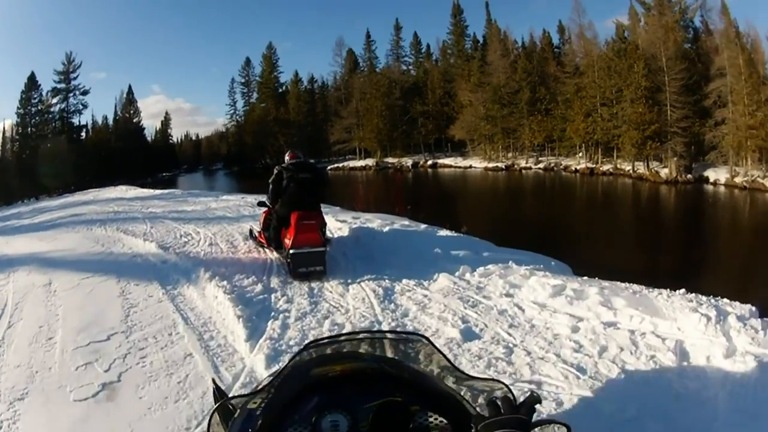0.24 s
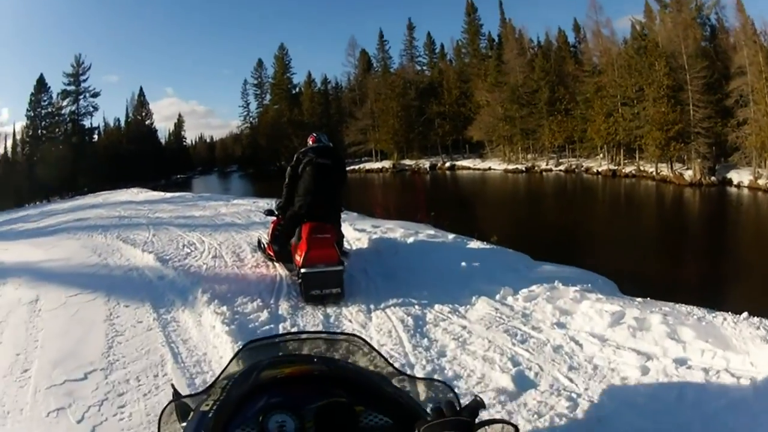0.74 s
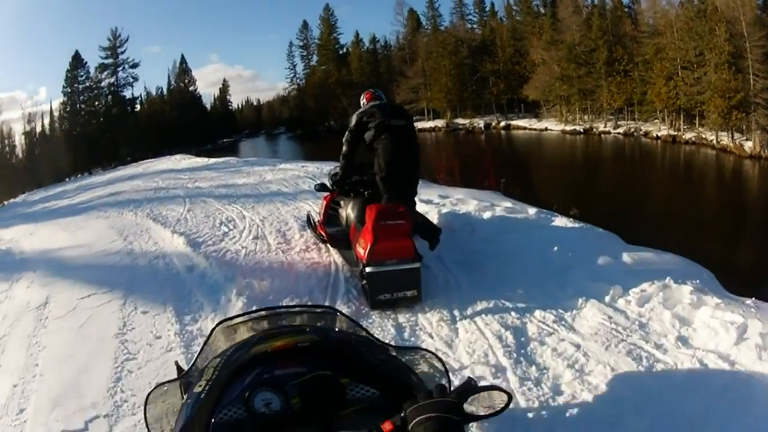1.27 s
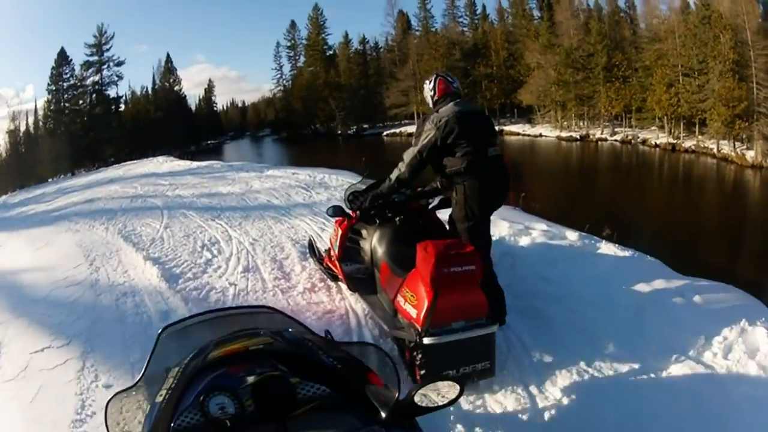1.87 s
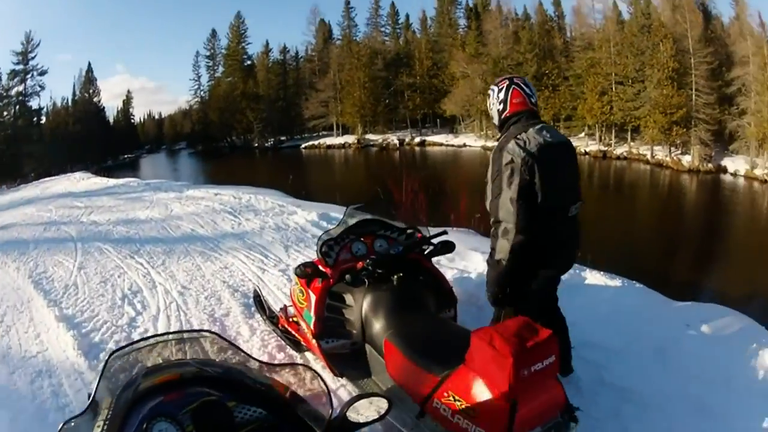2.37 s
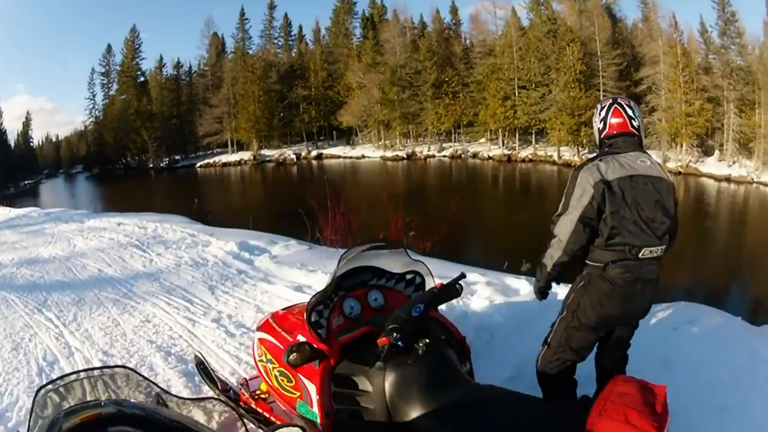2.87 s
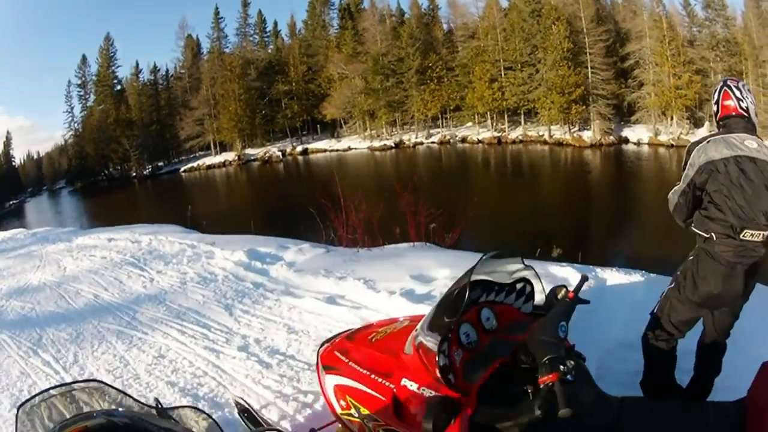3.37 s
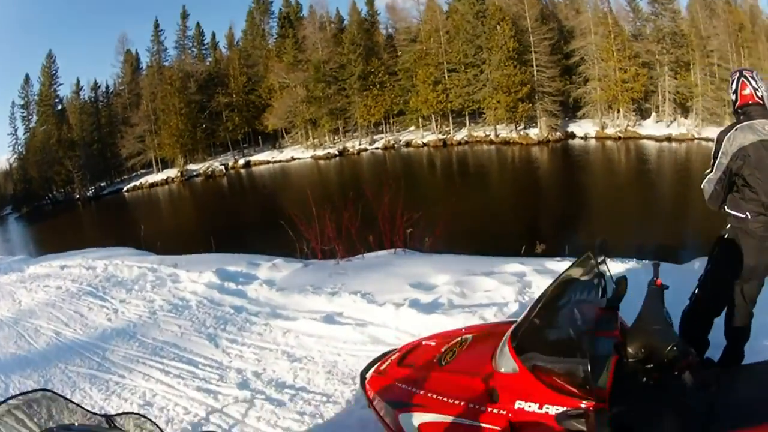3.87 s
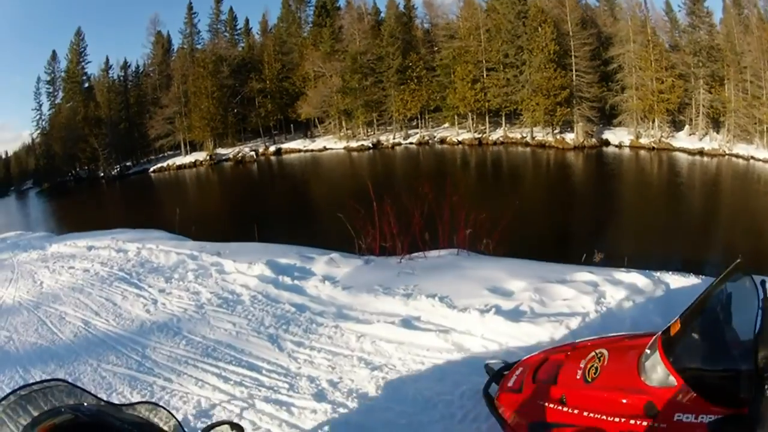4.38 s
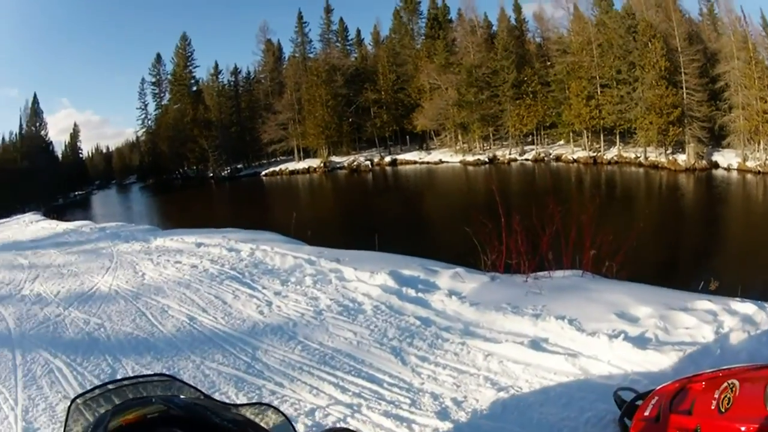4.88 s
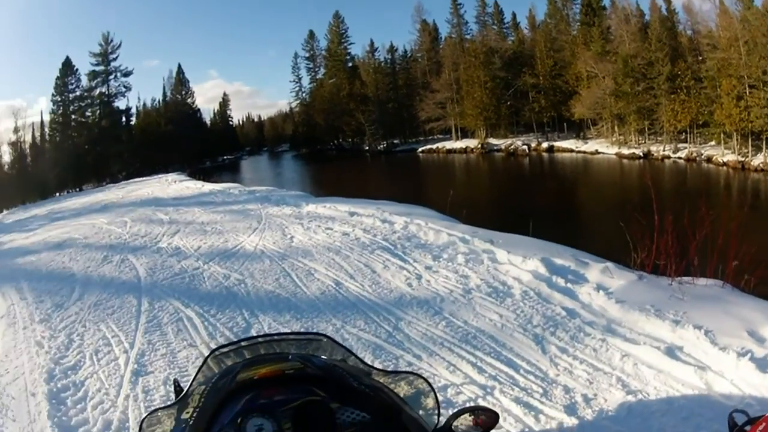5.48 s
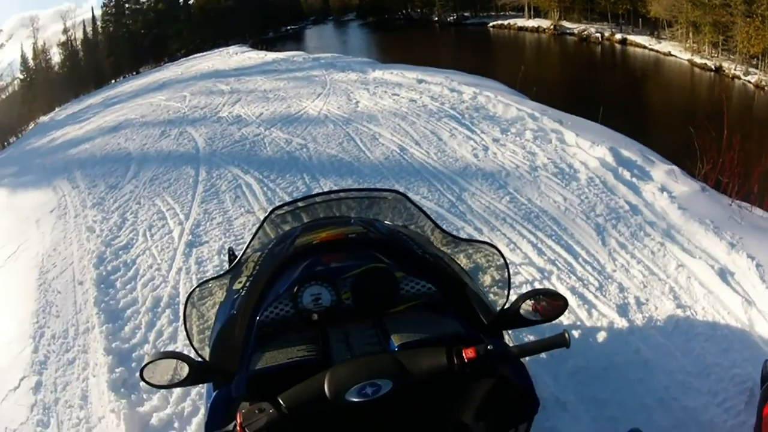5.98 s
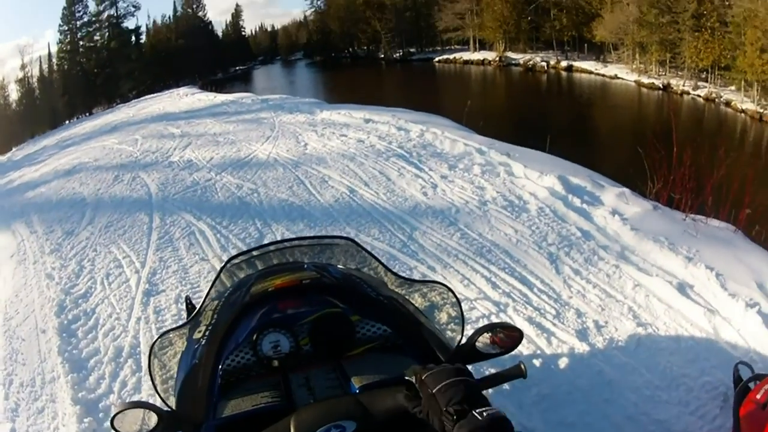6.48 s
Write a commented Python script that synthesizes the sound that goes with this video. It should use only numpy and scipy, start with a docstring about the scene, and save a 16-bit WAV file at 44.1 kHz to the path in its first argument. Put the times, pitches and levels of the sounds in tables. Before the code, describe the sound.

Close to the microphone, a snowmobile's two-stroke engine runs with a low, sputtering hum and rattling pistons. Two soft squeezes of the throttle near the start make it briefly louder, smoother and slightly buzzy. It then drops back and keeps idling to the end, with scattered small knocks. The sound is dry, in open snowy air, with a gritty edge on top.

```python
"""A snowmobile's two-cylinder, two-stroke engine idles, heard from the seat, and revs gently twice.
Its exhaust hums at the firing rate and stumbles about seven times a second. Pistons clatter under
the hood, the frame drones, a panel whines faintly and a loose clutch knocks. Snow gives no echo.
The sound is held in 8000 steps a second, which mirrors it into the treble as a gritty sheen."""
import sys
import numpy as np
from scipy import signal
from scipy.fft import rfft, irfft, next_fast_len
from scipy.io import wavfile
from scipy.ndimage import uniform_filter1d

SR = 44100
rng = np.random.default_rng(int(sys.argv[2]) if len(sys.argv) > 2 else 0)


def waveform_to_disk(signal):
    """Save audio, clipped to [-1, 1], as 16-bit WAV at the path in sys.argv[1]."""
    frames = np.transpose(np.atleast_2d(signal))
    scaled = np.clip(frames, -1, 1) * 32767
    samples = np.round(scaled).astype(np.int16)
    wavfile.write(sys.argv[1], SR, samples)


N = 297189


def from_db(db):
    """Turn decibels into a factor to multiply by."""
    return 10 ** (np.asarray(db) / 20)


def unit_power(x):
    """Scale a signal so that its average power is 1."""
    return x / np.sqrt(np.mean(x ** 2) + 1e-20)


def clock():
    """The time in seconds at every sample."""
    return np.arange(N) / SR


def curves(rows):
    """Join a table's points with straight lines, one curve for each column after the time."""
    times, *columns = np.transpose(rows)
    return [np.interp(clock(), times, column) for column in columns]


def band_noise(hz, width_hz):
    """Noise around one frequency, with power 1."""
    band = signal.butter(2, [max(hz - width_hz / 2, 10), hz + width_hz / 2], "band", fs=SR, output="sos")
    return unit_power(signal.sosfilt(band, rng.standard_normal(N + SR))[SR:])


def drift(rate):
    """A smooth random wobble of typical size 1 that changes about `rate` times a second."""
    hz = np.arange(N // 2 + 1) * SR / N
    return unit_power(irfft(rfft(rng.standard_normal(N)) / (1 + (hz / rate) ** 4), N))


def bumps(times, heights, delay_s, width_s):
    """A bell-shaped swell centred delay_s after each of the times."""
    t, out = clock(), np.zeros(N)
    for peak_s, height in zip(times + delay_s, heights):
        near = slice(*np.searchsorted(t, [peak_s - 4 * width_s, peak_s + 4 * width_s]))
        out[near] += height * np.exp(-.5 * ((t[near] - peak_s) / width_s) ** 2)
    return out


def resonate(x, modes, throttle=0, turned=0):
    """A body favours the pitches it rings at; throttle and head turn shift their balance. Power is 1."""
    size = next_fast_len(N)
    hz = np.arange(size // 2 + 1) * SR / size
    powers = [from_db(db) ** 2 / (1 + (2 * (hz - centre) / width) ** 4)
              for centre, width, db, *_ in modes]
    drive = rfft(x, size) / np.sqrt(sum(powers))
    out = 0
    for power, (*_, lift_db, turn_db) in zip(powers, modes):
        out += irfft(drive * power, size)[:N] * from_db(lift_db * throttle + turn_db * turned)
    return unit_power(out)


# Gentle squeezes of the throttle: t/s, length/s, firing rate added if held/Hz, swell of the hum/dB
REVS = [(.55, .52, 23.3, 5.2), (1.66, .345, 26, 5.8)]


def engine_speed(idle_hz=113.4, start_extra_hz=7.3, settle_s=.45, lever_travel_s=.1, inertia_s=.3):
    """Firings per second: the engine settles to its idle and takes a moment to answer the throttle."""
    t = clock()
    lever = sum(hz * ((t > start) & (t < start + length)) for start, length, hz, _ in REVS)
    pull = uniform_filter1d(lever, size=int(lever_travel_s * SR))
    keep = np.exp(-1 / (inertia_s * SR))
    gained_hz = signal.lfilter([1 - keep], [1, -keep], pull)
    return idle_hz + start_extra_hz * np.exp(-t / settle_s) + gained_hz


def rev_swell_db(lag_s=.042, width_share=.55):
    """The hum swells as soon as the engine pulls, before its speed is up."""
    t = clock() - lag_s
    return sum(db * np.exp(-2 * ((t - start - length / 2) / (width_share * length)) ** 4)
               for start, length, _, db in REVS)


# Deep stumbles, where the hum dips and bounces back: t/s, share of the hum lost/0-1, rebound/dB
DEEP_STUMBLES = [(0.083, 0.58, 1), (0.25, 0.78, 3), (.372, 0.55, 5.5), (0.511, .58, 3), (1.169, 0.4, 3.5),
                 (1.553, 0.38, -1.5), (2.51, 0.24, -3), (2.765, .55, 6), (3.026, 0.6, 4), (3.295, .5, 1.5),
                 (3.556, 0.41, 3.5), (4.019, 0.5, 1.5), (4.384, 0.78, 4.5), (4.507, 0.87, 1),
                 (4.79, 0.28, 2.5), (5.232, .65, 5.5), (5.371, .4, 6), (5.498, .52, 5), (5.816, .72, 4.5),
                 (5.956, 0.73, 7), (6.412, .62, 5), (6.541, 0.8, 6)]
STUMBLE_GAP_S = .135


def uneven_idle(throttle, mild_loss=.4, mild_rebound_db=2, jitter_s=.003):
    """Mild stumbles fill the gaps between the deep ones; the throttle smooths the mild ones away."""
    deep = np.array(DEEP_STUMBLES)
    times = np.concatenate([np.linspace(a, b, max(round((b - a) / STUMBLE_GAP_S), 1) + 1)[1:-1]
                            for a, b in zip(deep[:, 0], deep[1:, 0])])
    late, deeper = rng.standard_normal((len(times), 2)).T
    idling = (1 - np.interp(times, clock(), throttle)) ** 2
    lost = idling * mild_loss * (1 + .15 * deeper)
    mild = np.column_stack([times + jitter_s * late, lost, idling * mild_rebound_db])
    return np.vstack([deep, mild]).T


def crank(firing_hz, stumbles, sway):
    """Count the shaft's turns, two firings each: it slips back at a stumble, then hurries to catch up."""
    times, lost, _ = stumbles
    slip = 44 * bumps(times, lost, delay_s=0, width_s=.005)
    hurry = 11 * bumps(times, lost, delay_s=.0668, width_s=.02)
    lurch = hurry - slip
    lurch -= uniform_filter1d(lurch, size=SR // 4)  # keeps the average speed steady
    return np.cumsum(firing_hz + sway * (lurch + .8 * drift(20))) / SR / 2


# Exhaust tones beside the main hum: cycles per shaft turn, level against the hum/dB, change at full rev/dB
EXHAUST_TONES = [(1, -28.5, -2), (4, -31, 1.3), (5, -38, -8), (6, -42, 1.5), (10, -34, -13)]


def exhaust(turns, flywheel, stumbles, hum_db, throttle):
    """The muffler passes an almost pure hum; uneven firing adds more tones and stirs the pipe."""
    times, lost, rebound_db = stumbles
    dip = bumps(times, lost, delay_s=0, width_s=.0062)
    bounce_db = bumps(times, rebound_db, delay_s=.029, width_s=.012)
    flutter_db = (.55 - .35 * throttle) * drift(35)
    hum = np.clip(1 - dip, 0, 1) * from_db(bounce_db + flutter_db) * np.sin(4 * np.pi * turns)
    for multiple, db, lift_db in EXHAUST_TONES:
        # a weak firing unbalances the engine, which feeds the lowest tones most
        waver = 1 + .4 * drift(24) + 5 * dip / multiple
        tone = np.sin(2 * np.pi * (multiple * flywheel + rng.random()))
        hum += from_db(db + lift_db * throttle) * waver * tone
    pipe = from_db(-52) * band_noise(hz=163.1, width_hz=8.9) * (1 + .6 * dip) * (1 - .5 * throttle)
    low_burble = from_db(-52 - 3.7 * throttle) * band_noise(hz=60.5, width_hz=31)
    wide_burble = from_db(-52.5) * band_noise(hz=126, width_hz=123)
    return from_db(hum_db + 1.28) * hum + pipe + low_burble + wide_burble


def piston_slaps(turns, scatter_db, fade_s):
    """A piston clicks once a turn, and each click bounces briefly between engine and panels."""
    new_turn = np.diff(np.floor(turns), prepend=np.floor(turns[0])) > 0
    clicks = new_turn * from_db(scatter_db * rng.standard_normal(N))
    t = np.arange(SR // 20) / SR
    bounces = rng.standard_normal(len(t)) * from_db(-60 * t / fade_s)
    return unit_power(signal.fftconvolve(clicks, bounces)[:N])


# Where the hood rings: f/Hz, width/Hz, relative level/dB, change at full rev/dB, change with head turned/dB
HOOD_RINGS = [(1290.5, 121, 2, 2, -2.5), (1405, 62, -1, 3, 3), (1592, 106, 2.5, 0.5, -3.5),
              (1716, 103, 0.5, 0.5, 3), (1938, 160, -1, 2.5, -1), (2056, 82, 1.5, 4, 1),
              (2224, 132, -0.5, 1, 3), (2463, 280, -4, 1, -9), (2805, 230, -6.5, 3.5, -10),
              (3800, 2700, -14.5, 2.5, -2)]


def hood_clatter(turns, level_db, throttle, turned):
    """Two pistons slap in turn under the hood, over a rush of chain and fan that pulses with the shaft."""
    scatter_db = 4.5 - 3.1 * throttle
    first = piston_slaps(turns, scatter_db, fade_s=.092)
    second = piston_slaps(turns + .5, scatter_db, fade_s=.052)
    slaps = unit_power(first + from_db(-4.5) * second)
    pulsing = 1 + .093 * np.cos(2 * np.pi * (turns - .15))
    rush = unit_power(rng.standard_normal(N) * pulsing)
    slap_share = .17 + .23 * throttle
    clatter = np.sqrt(slap_share) * slaps + np.sqrt(1 - slap_share) * rush
    return from_db(level_db - .75 * throttle) * resonate(clatter, HOOD_RINGS, throttle, turned)


# Where the frame rings: f/Hz, width/Hz, relative level/dB, change at full rev/dB, with head turned/dB
FRAME_RINGS = [(383, 130, -3.5, 3, 3.5), (532, 97, -2, -1.5, 1), (691, 105, 2.5, 4, 0),
               (798, 75, 2.5, 4, 3), (996, 146, -1, 1, 2)]


def frame_drone(turns, level_db, throttle, turned):
    """The engine mounts pass the shaft's vibration into the frame, with some random shudder."""
    tones = sum(np.sin(2 * np.pi * (multiple * turns + rng.random())) for multiple in range(7, 20))
    shudder = (1.1 - .25 * throttle) * band_noise(hz=725, width_hz=980)
    vibration = (unit_power(tones) + shudder) * from_db(1.1 * drift(15))
    return from_db(level_db + .49 * throttle) * resonate(vibration, FRAME_RINGS, throttle, turned)


def breeze():
    """Moving air makes a very faint, deep rumble."""
    return from_db(-83 + 2.5 * drift(3)) * band_noise(hz=17, width_hz=20)


def panel_whine(hz=805, quiet_db=-72, swell_db=15, peak_s=3.74, rise_s=.71, fall_s=.15):
    """A panel gives a faint, unsteady tone that swells slowly once and drops back quickly."""
    since = clock() - peak_s
    swell = np.exp(-.5 * (since / np.where(since < 0, rise_s, fall_s)) ** 2)
    loudness = from_db(quiet_db + swell_db * swell + 6.6 * drift(14))
    return loudness * np.sin(2 * np.pi * np.cumsum(hz + 3 * drift(6.7)) / SR)


# Hard knocks of the loose clutch: t/s, level/dB
CLUTCH_KNOCKS = [(.2, -39.5), (.3, -44), (.408, -35.5), (0.85, -34.5), (1.214, -37), (1.777, -34.5),
                 (1.909, -36.5), (2.373, -35.5), (2.801, -40), (2.947, -38.5), (3.353, -40), (3.756, -38),
                 (4.425, -40), (4.567, -35.5), (4.706, -37.5), (5.28, -40.5), (5.543, -37.5), (6.14, -34.5),
                 (6.303, -36), (6.612, -37)]


def clutch(stumbles, turned, tap_delay_s=.0516, tap_db=-43.5, scatter_db=3):
    """The clutch knocks, and taps as the engine catches after a stumble; hood and frame ring with it."""
    knock_times, knock_levels = np.transpose(CLUTCH_KNOCKS)
    tap_times = stumbles[0] + tap_delay_s
    tap_levels = tap_db + scatter_db * rng.standard_normal(len(tap_times))
    # a tap only sounds if no hard knock is close by
    alone = np.abs(tap_times[:, None] - knock_times).min(axis=1) > STUMBLE_GAP_S / 2
    times = np.r_[knock_times, tap_times[alone]]
    strengths = from_db(np.r_[knock_levels, tap_levels[alone]])
    hit = bumps(times, strengths, delay_s=-.0025, width_s=.0032)
    chatter = bumps(times, .7 * strengths, delay_s=.0087, width_s=.0058)
    hood = resonate(rng.standard_normal(N), HOOD_RINGS, turned=turned)
    frame = resonate(rng.standard_normal(N), FRAME_RINGS)
    return (hit + chatter) * (hood + from_db(-13) * frame)


# The metallic ring that revving wakes: cycles per shaft turn, level at full rev/dB
BUZZ_TONES = [(24, -44), (25, -42), (26, -40), (31, -44)]


def rev_buzz(turns, throttle):
    """Under throttle the engine runs evenly, and a few of its high tones sing in the hood."""
    tones = 0
    for multiple, db in BUZZ_TONES:
        loudness = from_db(db + 2 * drift(10))
        tones += loudness * np.sin(2 * np.pi * (multiple * turns + rng.random()) + .5 * drift(12))
    return throttle * tones


# Base loudness at the seat, before revs and stumbles: t/s, exhaust hum/dB, hood clatter/dB, frame drone/dB
SEAT_LEVELS = [(0, -28, -39, -53.5), (.8, -28.5, -39, -54.5), (1.5, -29, -38, -53),
               (1.95, -30.5, -37.5, -50.5), (2.16, -26.5, -37.5, -53.5), (2.4, -32, -39.5, -55),
               (3.1, -32.5, -40.5, -57), (3.9, -33, -40, -56), (4.5, -30, -39.5, -58.5), (5, -32, -40, -58),
               (6, -30, -39.5, -55), (6.74, -30.2, -39.5, -55)]
# The listener's head: t/s, turned away from the hood/0-1
HEAD_TURN = [(0, 0.16), (1.9, 0.06), (2.4, 0.25), (2.9, 0.35), (4.3, 0.96), (4.9, 0.44), (5.4, 0.12),
             (6.74, 0)]


def scene(rev_start_hz=118, full_rev_hz=131):
    """One turning shaft drives the exhaust, the hood and the frame, so they all keep the same beat."""
    hum_db, hood_db, frame_db = curves(SEAT_LEVELS)
    turned, = curves(HEAD_TURN)
    firing_hz = engine_speed()
    throttle = np.clip((firing_hz - rev_start_hz) / (full_rev_hz - rev_start_hz), 0, 1)
    stumbles = uneven_idle(throttle)
    exhaust_turns = crank(firing_hz, stumbles, sway=.91)
    flywheel = crank(firing_hz, stumbles, sway=.15)  # the heavy wheel smooths out the lurches
    # the catch after a stumble shakes the whole machine
    times, lost, _ = stumbles
    shake = from_db(1.3 * bumps(times, lost, delay_s=.048, width_s=.028) + .5 * drift(15))
    hood = hood_clatter(flywheel, hood_db, throttle, turned) + rev_buzz(flywheel, throttle)
    frame = frame_drone(flywheel, frame_db, throttle, turned)
    air = breeze()
    hum = exhaust(exhaust_turns, flywheel, stumbles, hum_db + rev_swell_db(), throttle)
    return (hum + shake * (hood + frame) + air + clutch(stumbles, turned) + panel_whine())[None]


def record(dry):
    """Holding the sound in coarse steps mirrors it into the treble; the very top is then cut off."""
    step_hz, repeats, top_hz = 8000, 16, 15100
    lows = signal.sosfilt(signal.cheby2(14, 60, step_hz / 2, fs=SR, output="sos"), dry)
    samples = signal.resample_poly(lows, step_hz, SR, axis=-1, window=("kaiser", 3))
    steps = np.repeat(samples, repeats, axis=-1)
    held = signal.resample_poly(steps, SR, repeats * step_hz, axis=-1)[:, :N]
    return signal.sosfilt(signal.ellip(10, .1, 80, top_hz, fs=SR, output="sos"), held)


dry = scene()
out = record(dry)
waveform_to_disk(out)
```